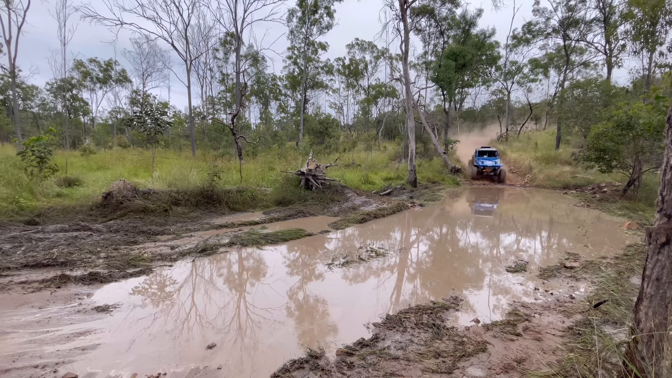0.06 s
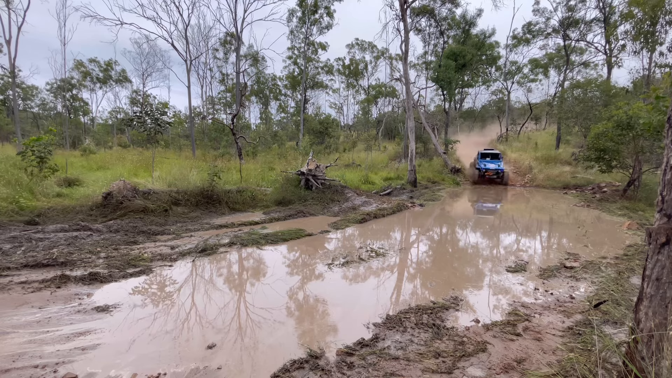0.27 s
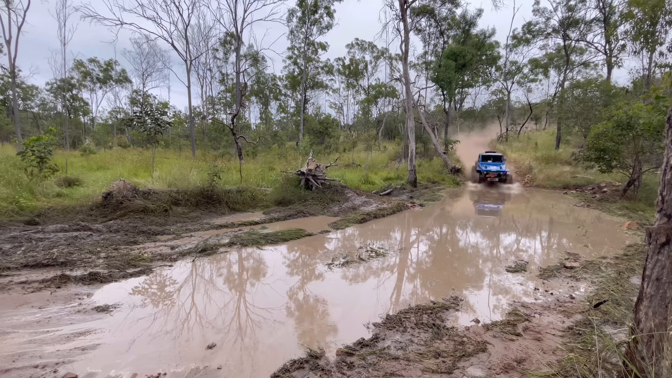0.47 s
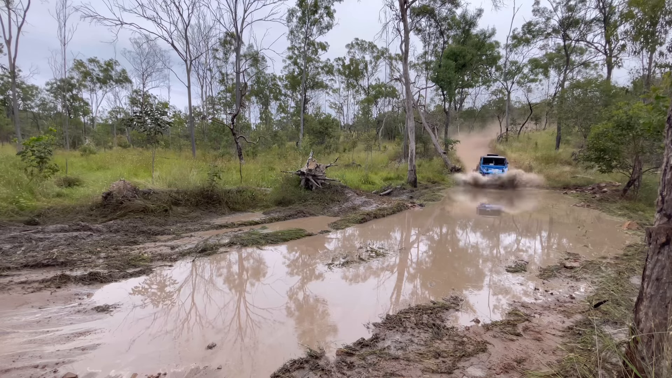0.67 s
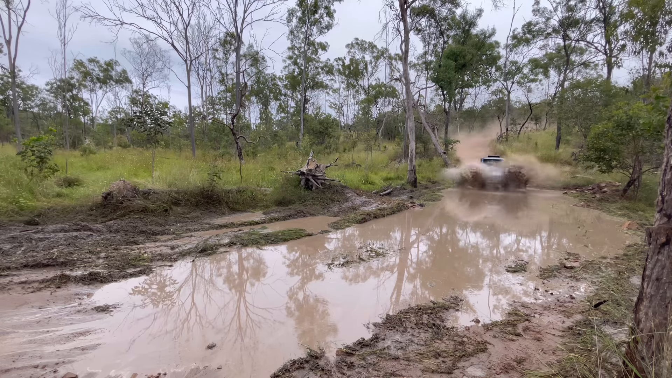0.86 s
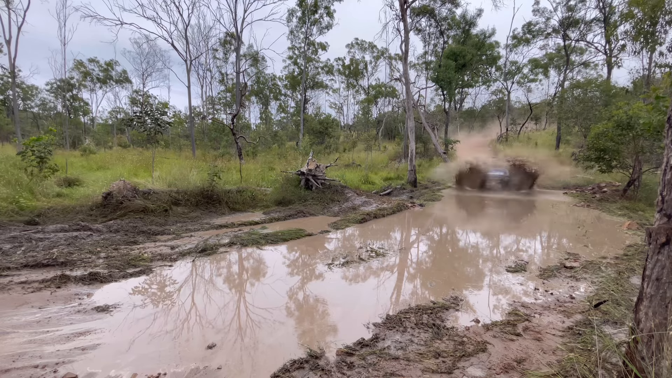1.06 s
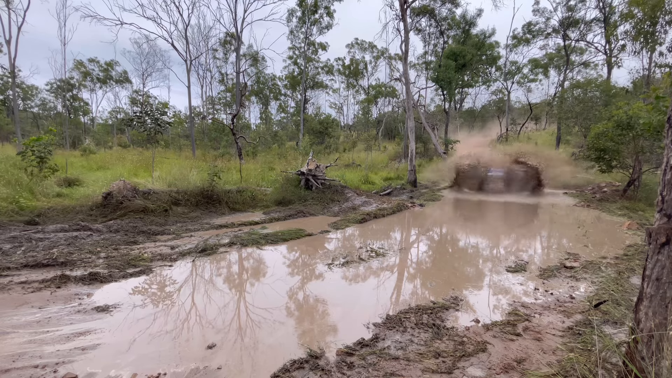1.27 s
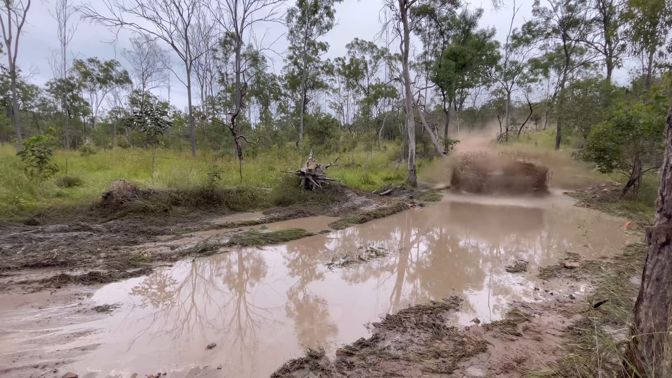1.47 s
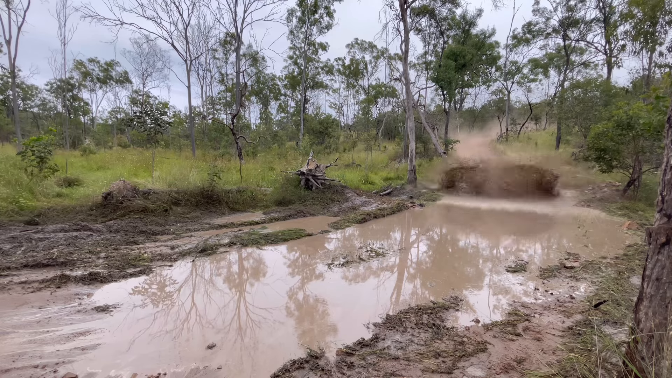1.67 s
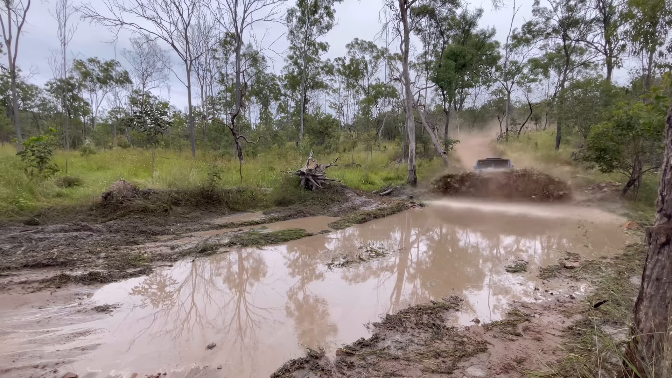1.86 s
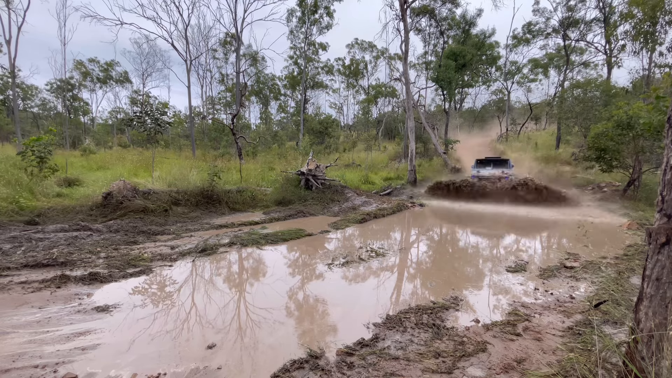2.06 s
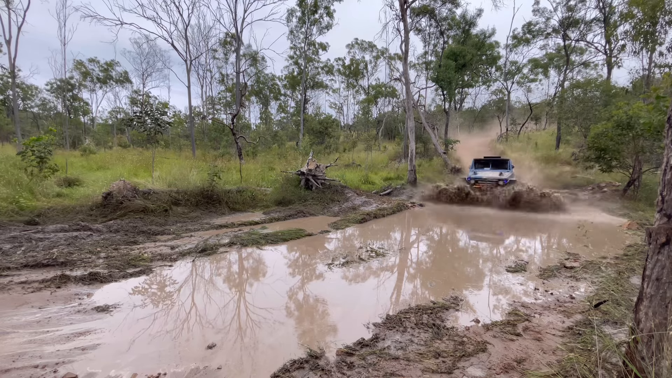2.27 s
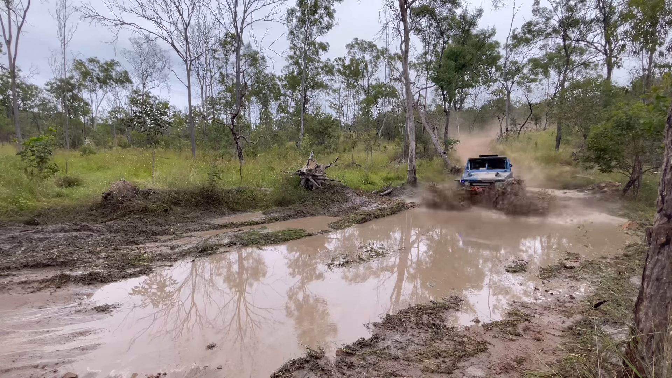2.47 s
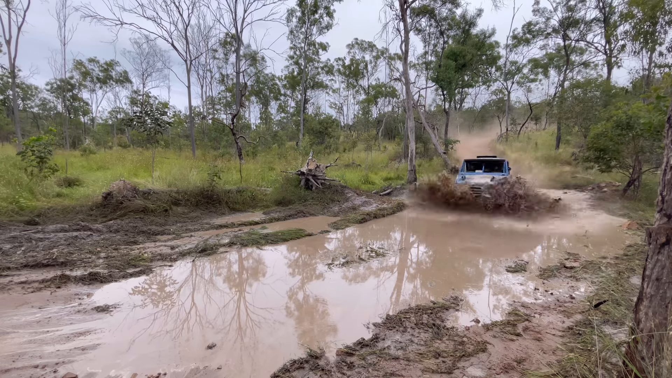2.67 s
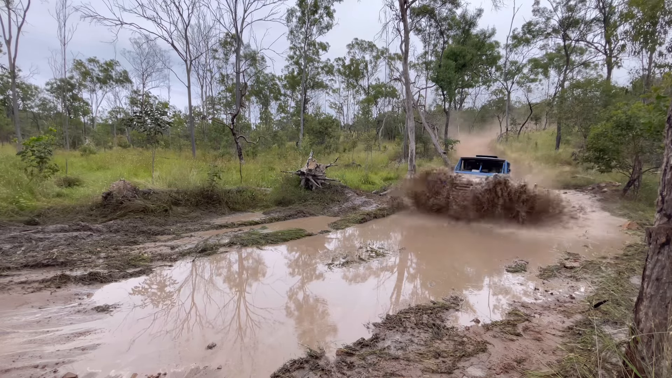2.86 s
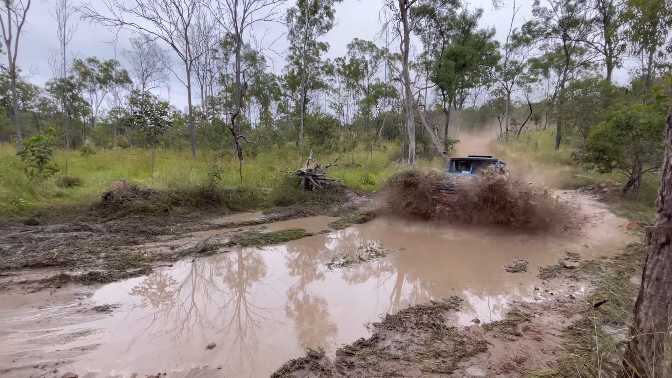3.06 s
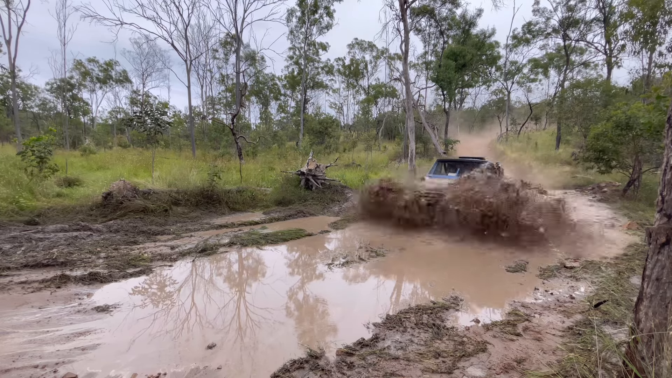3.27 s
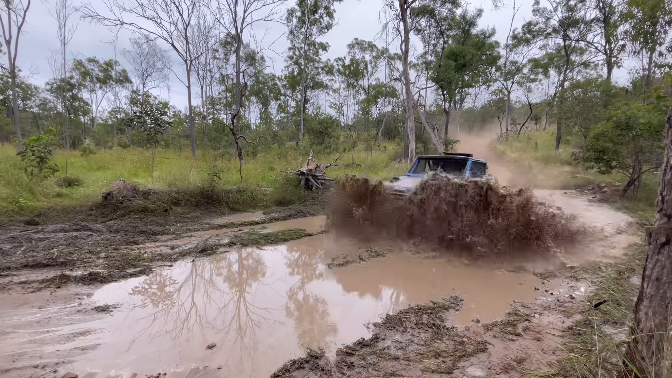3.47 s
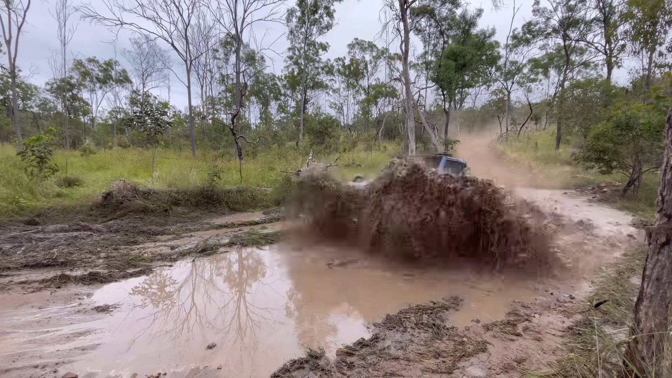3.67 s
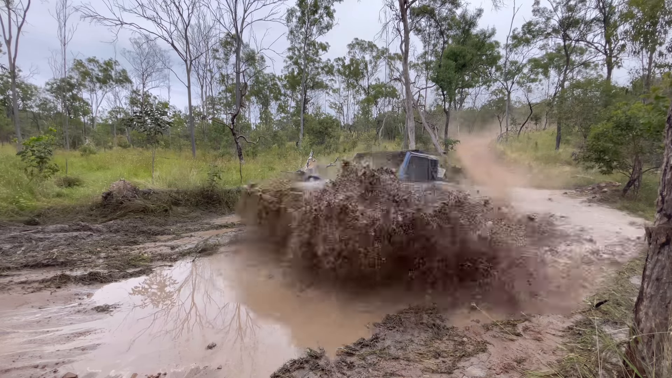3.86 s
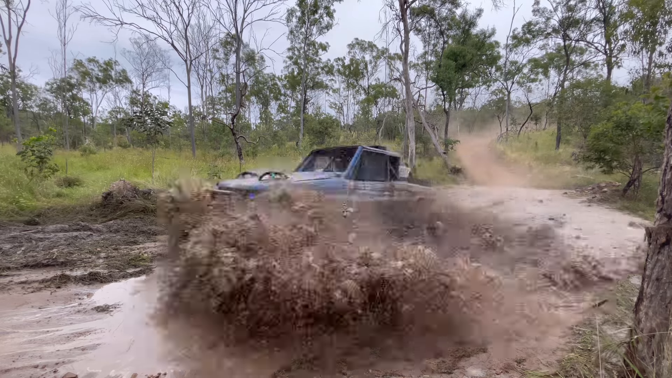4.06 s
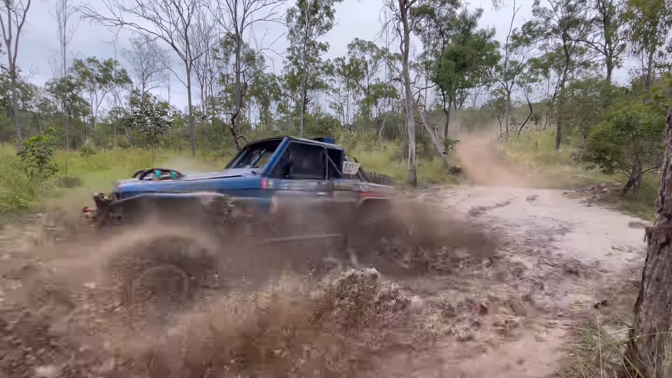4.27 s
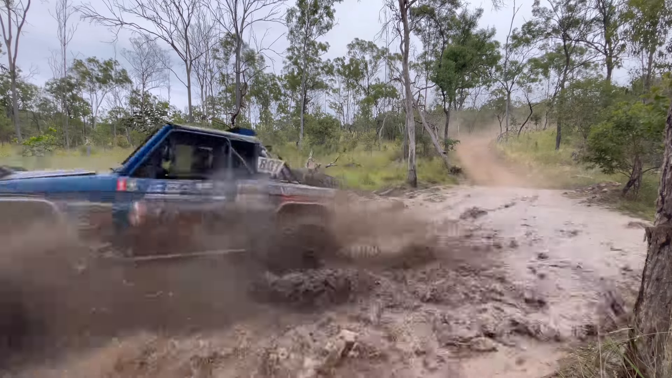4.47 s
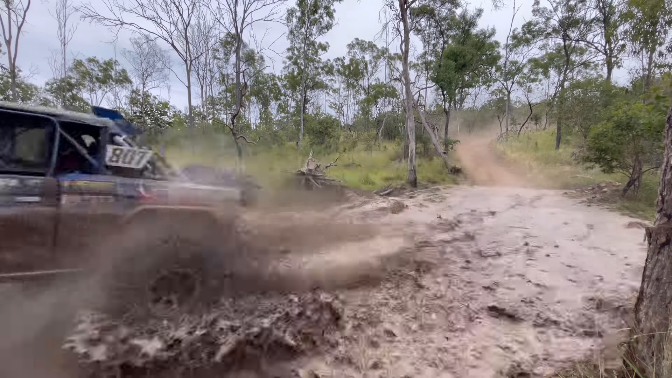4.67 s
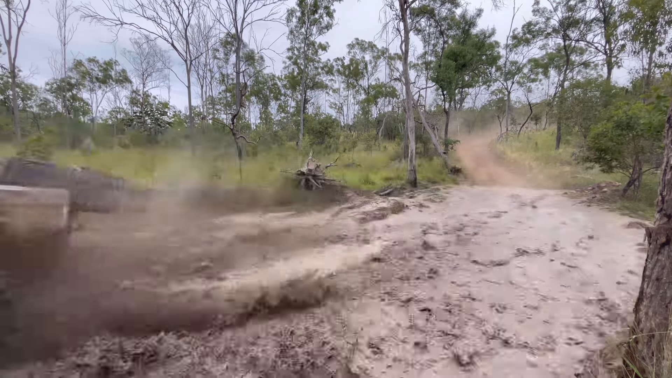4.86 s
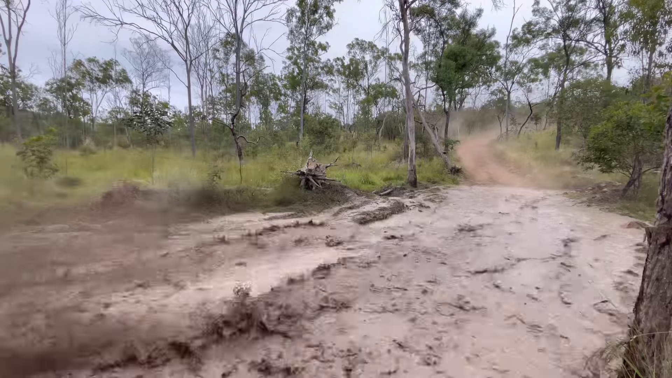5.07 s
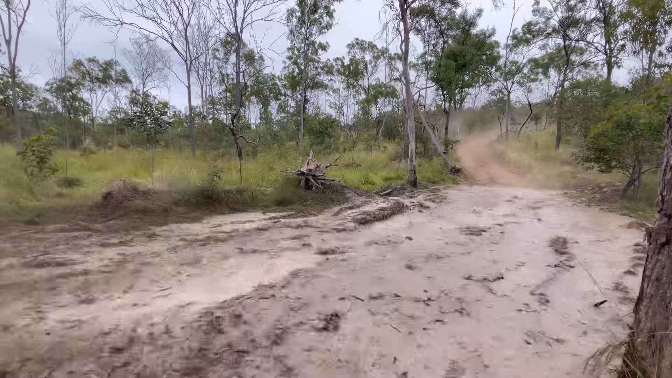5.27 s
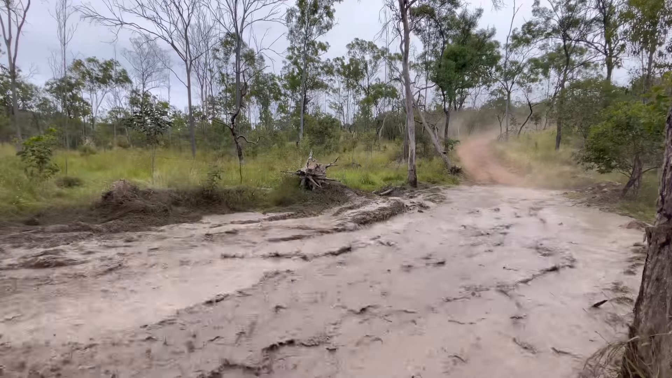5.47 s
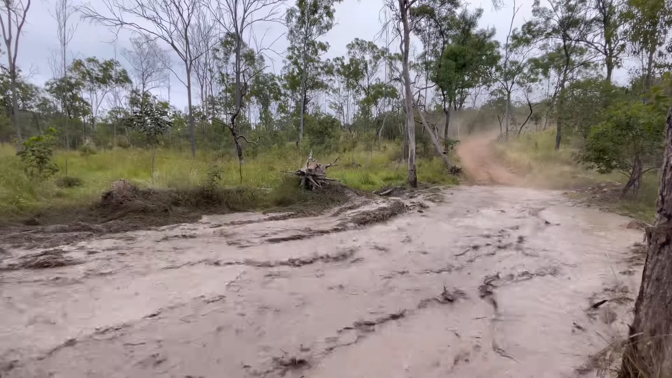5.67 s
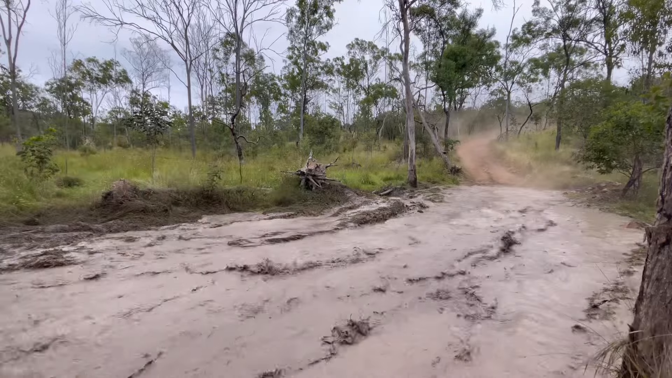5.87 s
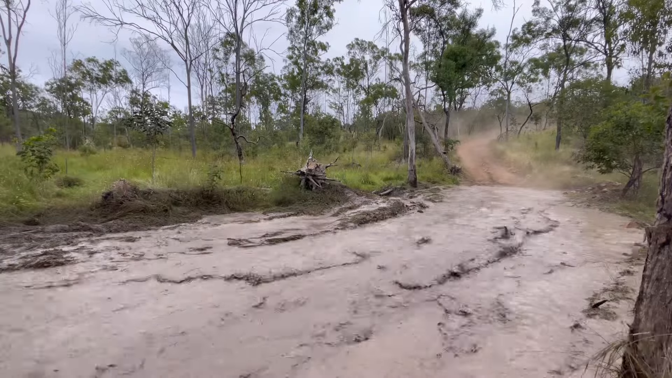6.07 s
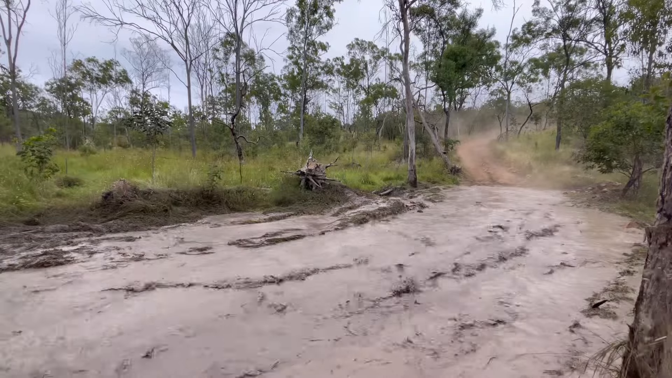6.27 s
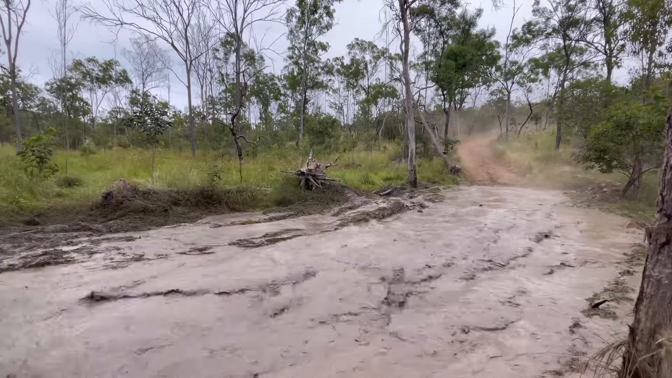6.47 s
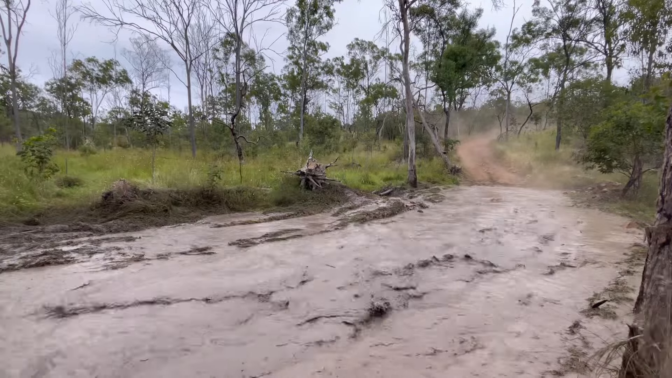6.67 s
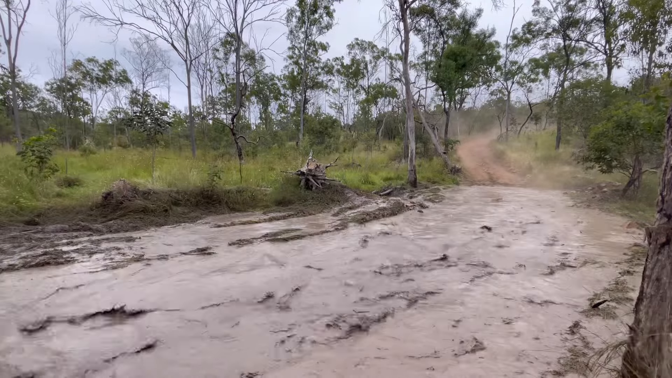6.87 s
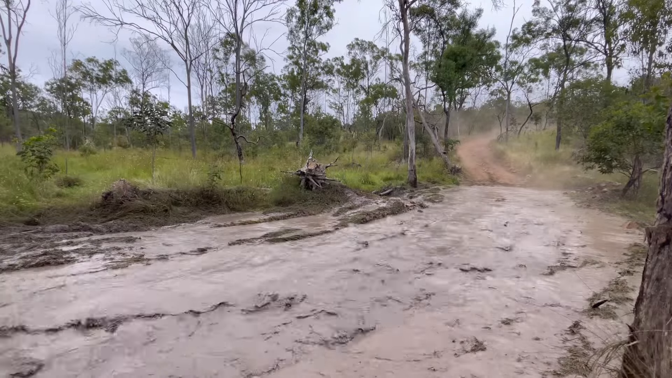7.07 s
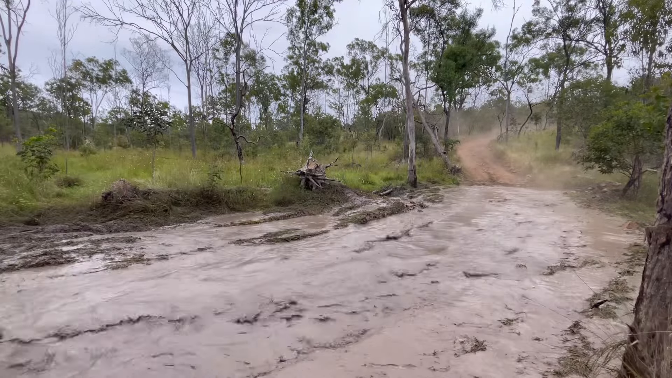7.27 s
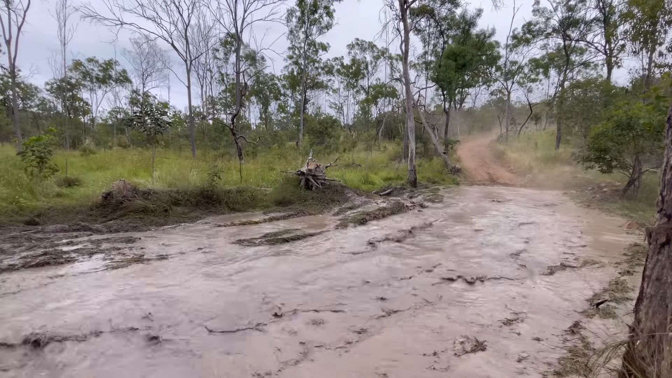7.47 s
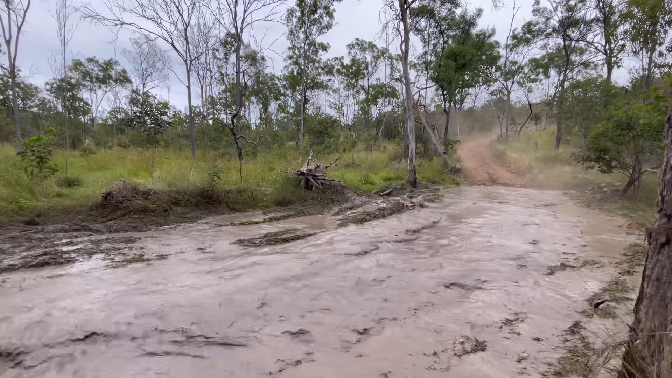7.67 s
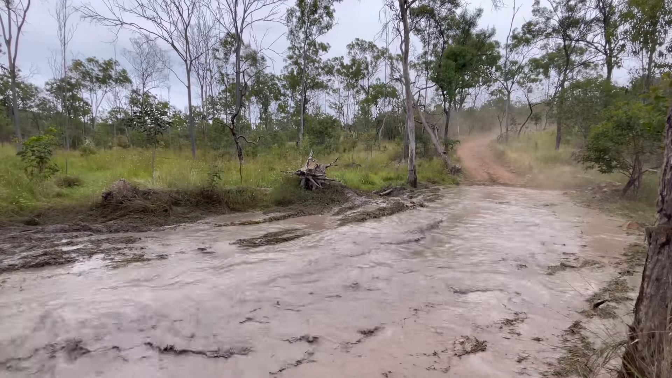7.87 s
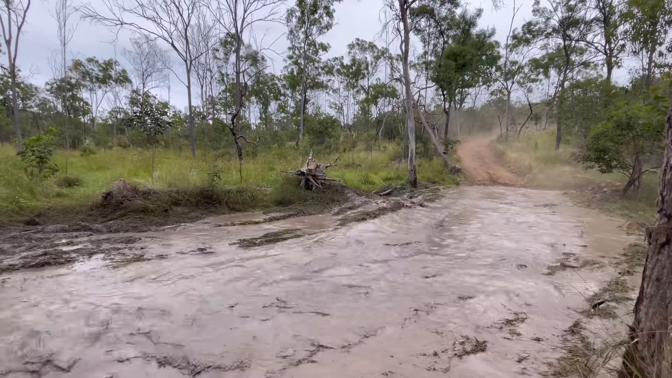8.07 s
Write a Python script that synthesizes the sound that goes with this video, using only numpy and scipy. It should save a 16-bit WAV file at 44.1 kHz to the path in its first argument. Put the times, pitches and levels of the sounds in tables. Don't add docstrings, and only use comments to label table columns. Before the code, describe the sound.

A V8 off-road truck roars toward us through a muddy pool, throws heavy spray close by on the left, then burbles away, revs climbing.

```python
import sys
import numpy as np
from scipy import signal
from scipy.fft import rfft, irfft, next_fast_len
from scipy.io import wavfile
from scipy.ndimage import uniform_filter1d, map_coordinates

SR = 44100
rng = np.random.default_rng(int(sys.argv[2]) if len(sys.argv) > 2 else 0)


def unload_wav(signal):
    wavfile.write(
        sys.argv[1],
        SR,
        np.round(np.clip(np.atleast_2d(signal).T, -1, 1) * 32767).astype(np.int16),
    )


def field_ratio(decibels):
    return 10 ** (np.asarray(decibels, dtype=float) / 20)


N = 358091

BEARING = [(0, 4.5, 0, .4), (.25, 4.5, 0, .5), (.35, 4.5, 0, .1), (1.8, 4.5, 0, .05), (2.7, 4.5, 0, .05),
           (3.6, 3.5, .9, .18), (4.0, 1, 1, .12), (4.3, -6, 1.2, .1), (4.6, -17, 2, .09),
           (5.13, -19, 3, .08), (5.3, -19.5, 4, .07), (5.9, -19, 5, .06), (6.85, -18.5, 5, .05),
           (7.05, -18, 5, .45), (7.3, -18, 5.3, .04), (7.6, -18, 6, .03), (8.12, -18, 6, .03)]
# [t/s, distance/m]
DISTANCE = [
    (0, 35),
    (1, 51),
    (2, 30.3),
    (3, 17),
    (3.7, 6.4),
    (4.4, 4.6),
    (5, 5.64),
    (6, 14),
    (7, 32.6),
    (8.12, 55.8),
]
# [t/s, speed/cycles per second]
ENGINE_SPEED = [(0, 14.3), (.45, 16), (.8, 15.2), (1.6, 15.1), (1.9, 16.5), (2.1, 18.7), (2.4, 19.3),
                (3, 20.6), (3.6, 21.5), (3.75, 21), (4.2, 21.4), (5.25, 24), (5.8, 25.05), (5.9, 26.2),
                (6.7, 28.7), (7.3, 28.8), (7.7, 30.05), (8.12, 30.4)]
# [t/s, speed
# lost/cycles per second, length/s]
BOGS = [(.17, 3.8, .46), (.62, 1.56, .26), (0.999, 1.45, .45), (1.37, 1.37, .3), (2.65, 0.72, 0.71),
        (3.34, 1.5, .55), (4.601, 0.64, .3), (4.82, .45, 0.34), (5.051, 1.11, 0.34), (5.449, .8, .32),
        (6.149, 1.3, .4), (6.52, 1.19, .28), (6.83, .8, .25), (7.049, 4.13, 0.43), (7.5, 0.29, 0.21),
        (7.8, 0.36, .2)]
# [t/s, level/dB]
FIRING_LEVEL = [(0, -8), (.45, -9.5), (1.55, -7), (1.9, -9), (2.1, -7), (2.65, -4), (2.85, -11),
                (3.4, -6.5), (3.64, -17), (3.78, -10.5), (4.4, -14), (5.3, -24.5), (5.75, -23.5),
                (5.95, -19), (6.35, -20), (6.85, -24.5), (7.35, -21.5), (8.12, -20.5)]
# [order of the engine cycle, level/dB]
FRONT_ORDERS = [(1, -48), (2, -44), (3, -37.5), (4, -35.5), (5, -33), (6, -24.5), (7, -23), (8, 2),
                (9, -24.5), (10, -24), (11, -26.5), (12, -28.5), (13, -21), (14, -46), (15, -30),
                (16, -22.5)]
# [order of the engine cycle, level/dB]
FLANK_ORDERS = [(1, -40), (2, -12.5), (3, -7), (4, -19.5), (5, 2.5), (6, -6), (7, -3), (8, 4.5), (9, -14),
                (10, -15), (11, -8), (12, -19), (13, -16), (14, -19), (15, -27), (16, -15)]
# [order of the engine cycle, level/dB]
REAR_ORDERS = [(1, -52), (2, -28.5), (3, -26), (4, -23.5), (5, -11), (6, -12), (7, -28), (8, 6), (9, -16.5),
               (10, -14.5), (11, -26), (12, -29.5), (13, -12), (14, -17.5), (15, -27), (16, -19),
               (17, -23.5), (18, -26), (19, -38), (20, -21), (21, -20), (22, -27), (23, -20), (24, -31),
               (25, -23), (26, -18.5), (27, -27.5), (28, -31), (31, -21), (37, -27), (42, -25)]
BANKS = np.array([1, -1, -1, 1, -1, 1, 1, -1])
VIEW_DB = dict(low_burble=(13.5, -12, -13.5, -14, -15, -18.5, -18.5),
           high_burble=(-14.5, -19, -17.5, -19.5, -14.5, -27, -44),
           uneven=(-20, -21, -24, -22.5, -19, -19, -16),
           low_bark=(-23.5, -21.5, -18, -15, -18.5, -22, -22.5),
           high_bark=(-36, -27, -14, -26.5, -27, -20, -19), gas=(-36, -34.5, -36, -22.5, -20, -22.5, -19),
           rumble=(-23, -27.5, -32.5, -28, -27, -36.5, -27))
# [share of the distance loss seen nose-on, change with throttle shut/dB]
FADE_LAWS = dict(low_burble=(2.75, -0.51), high_burble=(1.54, -12), uneven=(0.54, -5), low_bark=(0.75, -10),
             high_bark=(0.15, -8), gas=(.3, -13.5), rumble=(0.58, -3))
# [f/Hz, width/Hz, level/dB]
BARK_LOW = [
    (573, 141, 0.67),
    (680, 150, -1.7),
]
# [f/Hz, width/Hz, level/dB]
BARK_HIGH = [
    (1045, 193, 13.5),
    (1287, 120, -0.5),
]
# [f/Hz, level/dB per Hz]
GAS_COLOUR = [(760, 5), (1300, 0.5), (1590, 2.5), (1910, 1), (2080, 0), (3060, -13.5), (4540, -20.5),
              (5550, -43), (6840, -25), (7530, -28.5), (8220, -15.5), (9540, -31), (10500, -63),
              (13600, -64), (22000, -120)]
# [f/Hz, level/dB per Hz]
SPRAY_COLOUR = [(410, -38), (700, -7), (943, -5.5), (994, -18), (1210, -3.5), (1740, -12), (4250, -10.5),
                (4960, -9.5), (5510, -12.5), (6780, -13.5), (7420, -21), (8230, -13), (10400, -14),
                (12300, -12.5), (15500, -28)]
# [f/Hz, level/dB per Hz]
RUMBLE_COLOUR = [(25, -35), (45, -9.5), (90, 2), (200, -1), (245, 7), (290, -3), (400, -4), (600, -16.5),
                 (1000, -12.5)]
# [t/s, level/dB]
HISS_LEVEL = [(0, -54), (.4, -52.5), (.65, -44), (1.25, -44), (2.06, -35.5), (2.75, -38.5), (3.2, -33.5),
              (4.0, -31), (4.25, -27.5), (4.8, -36), (4.9, -40), (5.4, -41.5), (5.85, -48.5),
              (6.85, -52.5), (7.3, -53), (7.6, -42.5), (8.12, -45)]
# [t/s, spray level/dB, gas level/dB, length/s]
SLAMS = [
    (0, -26, -28.5, 0.0014),
    (0.056, -44, -55, .002),
    (0.149, -47, -42.5, 0.037),
    (0.358, -56, -48, 0.069),
    (.47, -38.5, -33.5, 0.074),
    (2.018, -46, -44, 0.05),
    (2.354, -36.5, -38.5, 0.17),
    (4.193, -41, -47, .08),
    (5.596, -55, -33, 0.11),
    (6.602, -56, -35, 0.12),
]
# [t/s, level/dB (the peak lies about 9 dB lower), f/Hz]
THUMPS = [
    (0.168, -15, 93),
    (1.249, -17, 95),
    (2.879, -5, 70.5),
    (3.648, -8, 95),
    (6.982, -19, 67.3),
]
# [t/s, level/dB]
RATTLE_LEVEL = [
    (5.08, -70),
    (5.15, -41),
    (5.4, -43),
    (5.6, -43),
    (5.68, -70),
]
# [f/Hz, level/dB]
SHADOW_FRONT = [(60, -4.5), (110, -0.5), (200, 0), (380, -3.5), (700, -6), (1290, -6.5), (2380, -5),
                (4400, 1.5), (8120, 2.5), (15000, -1)]
# [f/Hz, level/dB]
SHADOW_REAR = [(60, 1), (110, -1.0), (200, -1), (380, 2), (700, 8), (1290, 5), (2380, 3.0), (4400, 17),
               (8120, 13.5), (15000, 6)]
# [f/Hz, phase/radians]
TWIST_FRONT = [(60, 0), (300, -.4), (600, -1.05), (1600, -.9), (2500, .8), (5300, -.2), (7100, 4.3),
               (8400, 8.9), (10400, 9.4), (12600, 8.3)]
# [f/Hz, phase/radians]
TWIST_REAR = [(40, .2), (200, .65), (500, 1.05), (800, .6), (1100, .1), (2200, -.45), (3300, .5),
              (5500, -1.5), (8200, -.4), (10900, -8), (12500, -15)]

NEAREST_M = 4
LOSS_BEHIND = 0.84
STUMBLE_DB = 46
BOG_DB, BOG_LEAD_S = -2, 0.041
BOG_BARK_DB = -1
SHIFT_S, SHUT_S, CLOSE_S, OPEN_S = 7.02, 0.088, .15, 0.16
SHIFT_SPRAY_DB, SHIFT_FIRING_DB = -10.5, -9
INTAKE_ORDER, INTAKE_DB = 21, -31
SLAM_ATTACK, SLAM_RELEASE, SLAM_BARK_DB = 0.33, 0.61, 1
AIR_HZ = 7960
WOOD_T60_S, WOOD_DB = .9, -16
MONO_HZ = 12900


def curves(table):
    s, *columns = np.transpose(table)
    return [np.interp(np.arange(N) / SR, s, c) for c in columns]


def unit(x):
    return x / np.sqrt(np.mean(x ** 2))


def on_log(points, hz):
    f, v = np.transpose(points)
    return np.interp(np.log(hz + 1), np.log(f + 1), v)


def colour(x, points, ref_hz=None):
    size = next_fast_len(N)
    hz = np.arange(size // 2 + 1) * SR / size
    inside = (hz > points[0][0]) & (hz < points[-1][0])
    spectrum = rfft(x, size) * field_ratio(on_log(points, hz)) * inside
    band = spectrum[..., (hz > ref_hz[0]) & (hz < ref_hz[1])]
    band_rms = np.sqrt(2 * np.sum(abs(band) ** 2) / np.size(x) * N)
    return irfft(spectrum, size)[..., :N] * size / band_rms


def walk(rate):
    k = int(SR / rate)
    held = np.repeat(rng.standard_normal(N // k + 1), k)
    return 1.45 * uniform_filter1d(uniform_filter1d(held, k), k)[:N]


def lowpass(x, order, hz):
    return signal.sosfilt(signal.butter(order, hz, fs=SR, output="sos"), x)


def bogging(lead_s=0):
    t = np.arange(0, N / SR + .01, .01)
    dips = np.zeros(len(t))
    for s, lost, length in BOGS:
        dips += lost * np.cos(np.pi * np.clip((t + lead_s - s) / length, -.5, .5)) ** 2
    return curves(np.transpose([t, dips]))[0]


def throttle_shut():
    opens_s = SHIFT_S + SHUT_S
    return curves([(SHIFT_S - CLOSE_S, 0), (SHIFT_S, 1), (opens_s, 1), (opens_s + OPEN_S, 0)])[0]


def heard_db(part, view):
    ahead, shut_db = FADE_LAWS[part]
    loss_db = 20 * np.log10(NEAREST_M / curves(DISTANCE)[0])
    share = np.interp(view, [0, 1], [ahead, LOSS_BEHIND])
    return np.interp(view, range(7), VIEW_DB[part]) + share * loss_db + shut_db * throttle_shut()


def housing(pair, shadow, twist, lag=0):
    size = next_fast_len(N)
    hz = np.arange(size // 2 + 1) * SR / size
    side = np.array([[.5], [-.5]])
    turn = on_log(twist, hz) - 2 * np.pi * hz * lag / SR
    change = field_ratio(side * on_log(shadow, hz)) * np.exp(1j * side * turn)
    return irfft(rfft(pair, size) * change, size)[:, :N]


def ports(x, lag, facing):
    pair = np.array([map_coordinates(x, [np.arange(N) - side * lag / 2], order=3) for side in (1, -1)])
    ahead = housing(pair, SHADOW_FRONT, TWIST_FRONT)
    behind = housing(pair, SHADOW_REAR, TWIST_REAR)
    return (1 - facing) * ahead + facing * behind


def engine_tone(turns, aspect, rough, pipe_db, fire_db, low_db, high_db, odd_db):
    front, flank, rear = dict(FRONT_ORDERS), dict(FLANK_ORDERS), dict(REAR_ORDERS)
    out = np.zeros(N)
    for k in sorted(rear):
        if k in (8, 13, 16, 24):
            family, db = 8, fire_db
        elif k % 8 not in (3, 5):
            family, db = 6, odd_db
        elif k < 8:
            family, db = 5, low_db
        else:
            family, db = 11, high_db
        if k in front:
            balance = [view[k] - view[family] for view in (front, flank, rear)]
            db = db + np.interp(aspect, [0, 1, 2], balance)
        else:
            db = pipe_db + rear[k] + 16.5
            db = db - 11.8 * np.clip(2 - aspect, 0, 1) - 16.0 * np.clip(1 - aspect, 0, 1)
            if k == INTAKE_ORDER:
                db = db + 14.0 * np.clip(aspect - 2, 0, 1)
        spread = rough * np.sqrt(k / 8)
        wobble = 1 + spread * walk(22)
        start = .013 * k ** 2 if k in (5, 8, 11) else rng.random()
        out += field_ratio(db) * wobble * np.sin(2 * np.pi * (k * turns + start) + spread * walk(22))
    return np.sqrt(2) * out


def intake(turns, aspect, fire_db):
    early = np.clip(2 - np.arange(N) / SR, 0, 1)
    db = fire_db + INTAKE_DB - 15 * aspect + 5 * walk(6) - 12 * early
    return np.sqrt(2) * field_ratio(db) * np.sin(2 * np.pi * INTAKE_ORDER * turns + 0.33 * walk(21))


def firings(turns, scatter_db):
    index = np.floor(8 * turns).astype(int)
    size = field_ratio(scatter_db * np.clip(rng.standard_normal(index[-1] + 1), -2, 2))
    return 8 * turns - index, size[index], np.array(BANKS)[index % 8]


def bark(turns, aspect, pipes):
    phase, size, bank = firings(turns, scatter_db=1.5)
    fronts = size * (bank + .3) * np.exp(-phase / .08)
    turbulence = unit(size * np.exp(-phase / .5) * rng.standard_normal(N))
    drive = unit(np.diff(fronts, prepend=0)) + np.interp(aspect, [1, 2], [.75, .35]) * turbulence
    out = 0
    for hz, width, db in pipes:
        ring = signal.iirpeak(hz, hz / (1.7 * width), SR)
        out = out + field_ratio(db) * unit(signal.lfilter(*ring, signal.lfilter(*ring, drive)))
    return unit(out)


def gas(turns):
    phase, size, bank = firings(turns, scatter_db=3.5)
    puffs = .5 + size * field_ratio(2.5 * bank) * np.exp(-phase / .3)
    return colour(puffs * rng.standard_normal(N), GAS_COLOUR, ref_hz=(1500, 3000))


def rumble():
    return colour(field_ratio(2.0 * walk(11)) * rng.standard_normal(N), RUMBLE_COLOUR, ref_hz=(300, 450))


def slams():
    t, out = np.arange(N) / SR, 0
    for s, spray_db, gas_db, length in SLAMS:
        attack = np.clip(1 + (t - s) / (SLAM_ATTACK * length), 0, 1)
        release = np.exp(-np.maximum(t - s - length, 0) / (SLAM_RELEASE * length))
        out = out + field_ratio(np.array([[spray_db], [gas_db]])) * attack * release
    return out


def spray(past):
    landed = rng.random(N) < 1500 / SR
    drop_db = 3.5 * np.minimum(rng.exponential(size=N), 4)
    drops = landed * field_ratio(drop_db) * rng.standard_normal(N)
    hiss = field_ratio(1.0 * walk(30)) * (rng.standard_normal(N) + .6 * unit(drops))
    near = colour(hiss, SPRAY_COLOUR, ref_hz=(10000, 13000))
    far = signal.sosfiltfilt(signal.butter(6, 12300, fs=SR, output="sos"), near)
    gone = lowpass(far, 1, AIR_HZ)
    return np.clip(1 - past, 0, 1) * near + (1 - abs(1 - past)) * far + np.clip(past - 1, 0, 1) * gone


def woods(x):
    t = np.arange(int(WOOD_T60_S * SR)) / SR
    decay = np.exp(-np.log(1000) * t / WOOD_T60_S) * (t > .02)
    mid, side = rng.standard_normal((2, len(t))) * decay
    side = signal.sosfilt(signal.butter(2, 400, "high", fs=SR, output="sos"), side)
    dull = signal.butter(1, [250, 4000], "band", fs=SR, output="sos")
    tail = signal.sosfilt(dull, [mid + side, mid - side])
    tail = tail / np.sqrt(np.sum(tail[0] ** 2))
    return field_ratio(WOOD_DB) * signal.fftconvolve(x[None], tail, axes=1)[:, :N]


def thumps():
    t, out = np.arange(int(.3 * SR)) / SR, np.zeros(N + SR)
    for s, db, hz in THUMPS:
        at = int(s * SR)
        swell = (t / 0.068) * np.exp(1 - t / 0.023)
        out[at:at + len(t)] += field_ratio(db) * np.sin(2 * np.pi * hz * t) * swell
    return out[:N]


def rattle(turns):
    phase = (turns + 0.33) % 1
    size = field_ratio(5 * rng.standard_normal(int(turns[-1]) + 2))[(turns + .3).astype(int)]
    second = 0.8 * (phase > .22) * np.exp(-abs(phase - .22) / 0.061)
    ticks = size * (np.exp(-phase / 0.12) + second) * rng.standard_normal(N)
    ring = signal.sosfilt(signal.butter(2, [3600, 5200], "band", fs=SR, output="sos"), ticks)
    return field_ratio(curves(RATTLE_LEVEL)[0]) * unit(ring)


def scene():
    turns = np.cumsum(curves(ENGINE_SPEED)[0] - bogging()) / SR
    lag, view, rough = curves(BEARING)
    aspect = np.interp(view, [0, 1, 4, 5, 6], [0, 1, 1, 2, 3])
    facing = np.clip((lag.max() - lag) / (lag.max() - lag.min()), 0, 1)
    shut = throttle_shut()

    db = {part: heard_db(part, view) for part in VIEW_DB}
    fire_db = curves(FIRING_LEVEL)[0] + BOG_DB * bogging(BOG_LEAD_S) + SHIFT_FIRING_DB * shut
    high_db = db["high_burble"] + STUMBLE_DB * rough * np.clip(1 - view, 0, 1)
    for part in ("low_bark", "high_bark", "gas"):
        db[part] = db[part] + BOG_BARK_DB * bogging()

    splash, cough = slams()
    cough_bark = field_ratio(SLAM_BARK_DB) * cough
    truck = engine_tone(turns, aspect, rough, db["low_bark"], fire_db, db["low_burble"], high_db, db["uneven"])
    truck += intake(turns, aspect, fire_db)
    low_db = db["low_bark"] - 0.75 * np.clip(aspect - 1, 0, 2)
    truck += np.hypot(field_ratio(low_db), cough_bark) * bark(turns, aspect, BARK_LOW)
    truck += np.hypot(field_ratio(db["high_bark"]), cough_bark) * bark(turns, aspect, BARK_HIGH)
    truck += np.hypot(field_ratio(db["gas"]), cough) * gas(turns)
    truck += field_ratio(db["rumble"]) * rumble() + thumps() + rattle(turns)

    past = np.interp(view, [2, 4, 5, 6], [0, .9, 1.2, 2])
    water = np.hypot(field_ratio(curves(HISS_LEVEL)[0] + SHIFT_SPRAY_DB * shut), splash)
    pool = housing(water * spray(past), SHADOW_FRONT, TWIST_FRONT, lag=4.5)
    wide = field_ratio(-3.5) * water * np.array([spray(past), spray(past)])
    return ports(truck, lag, facing) + pool + wide + woods(truck)


def top_cut(x):
    return signal.sosfilt(signal.butter(12, 15700, fs=SR, output="sos"), x)


def record(dry):
    mid, side = (dry[0] + dry[1]) / 2, (dry[0] - dry[1]) / 2
    side = signal.sosfiltfilt(signal.butter(8, MONO_HZ, fs=SR, output="sos"), side)
    x = np.array([mid + side, mid - side])
    x = x / (1 + (abs(x) / .97) ** 4) ** .25
    return top_cut(x)


dry = scene()
out = record(dry)
unload_wav(out)
```